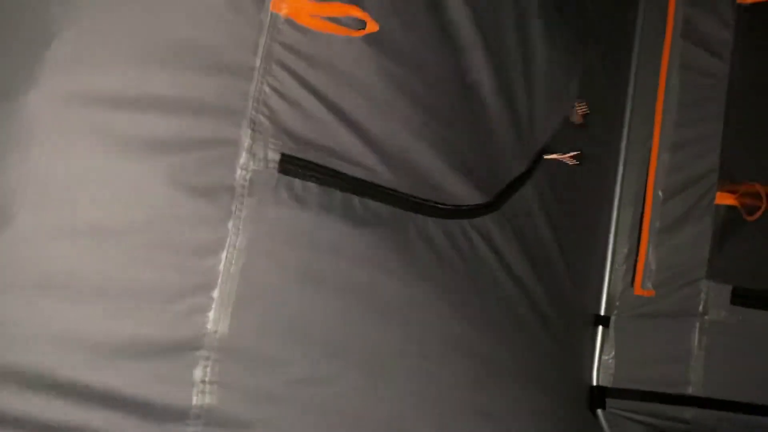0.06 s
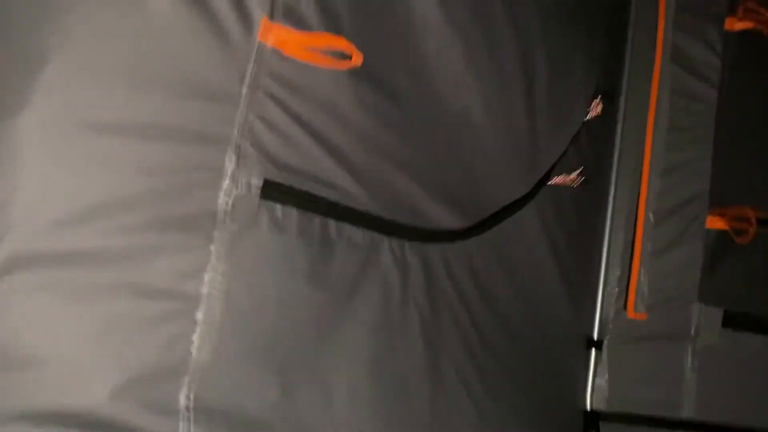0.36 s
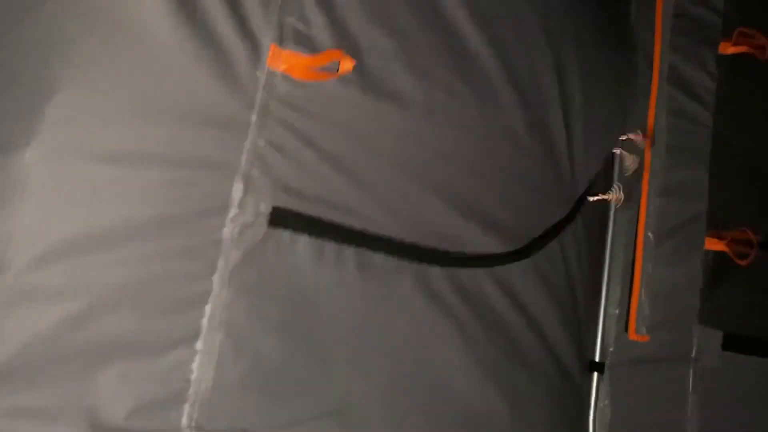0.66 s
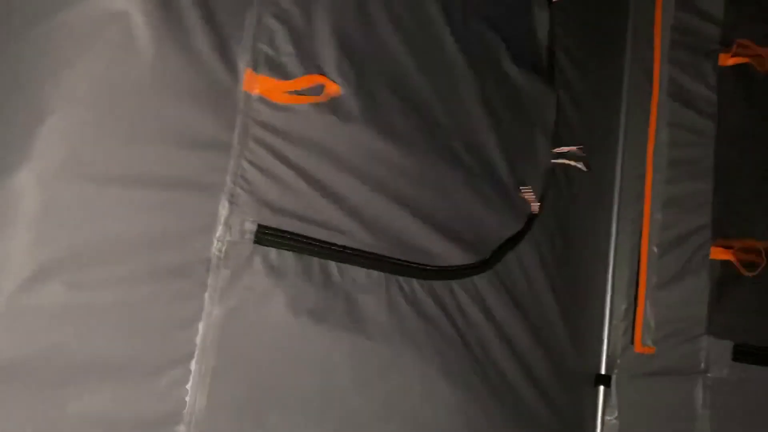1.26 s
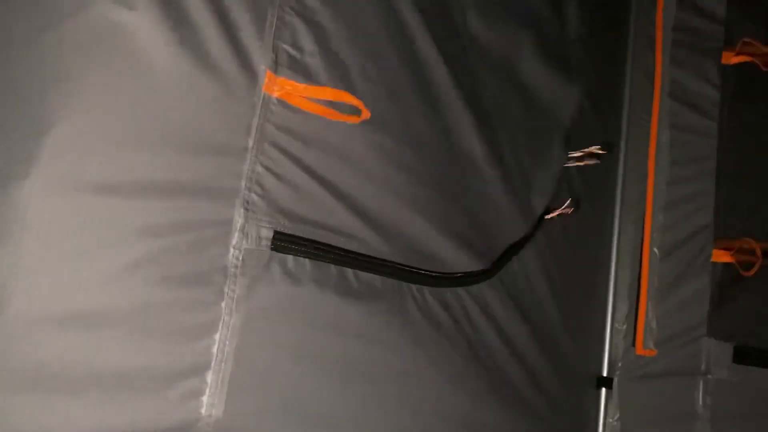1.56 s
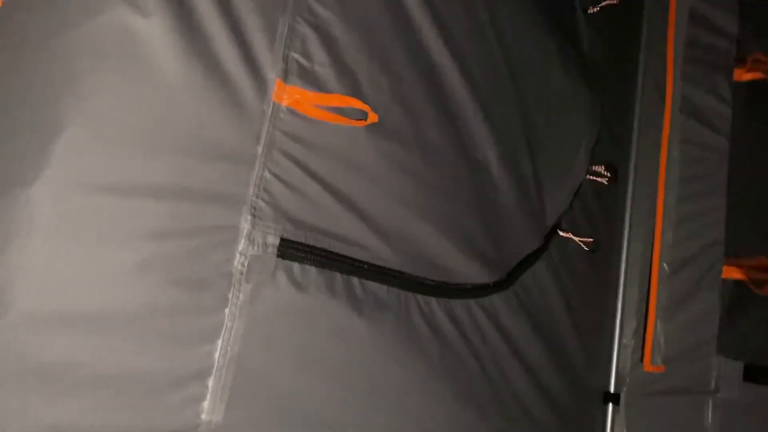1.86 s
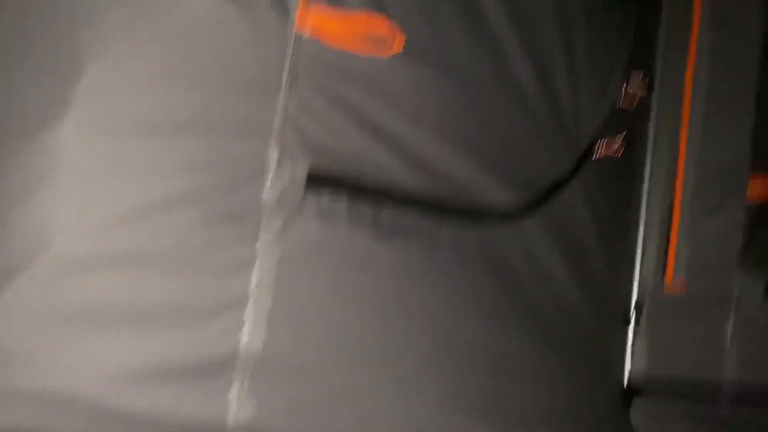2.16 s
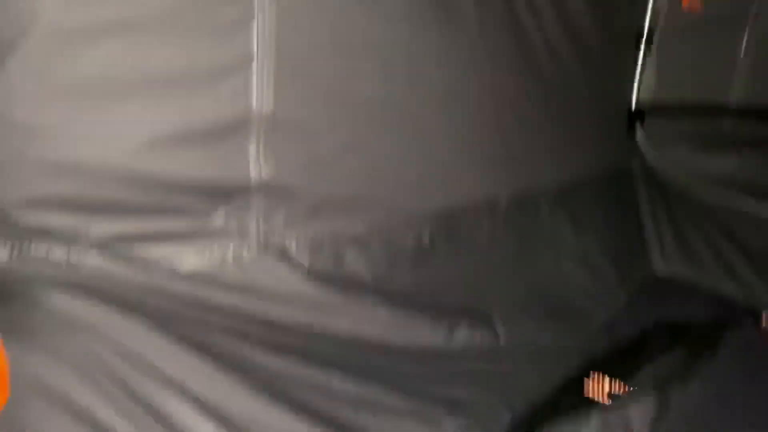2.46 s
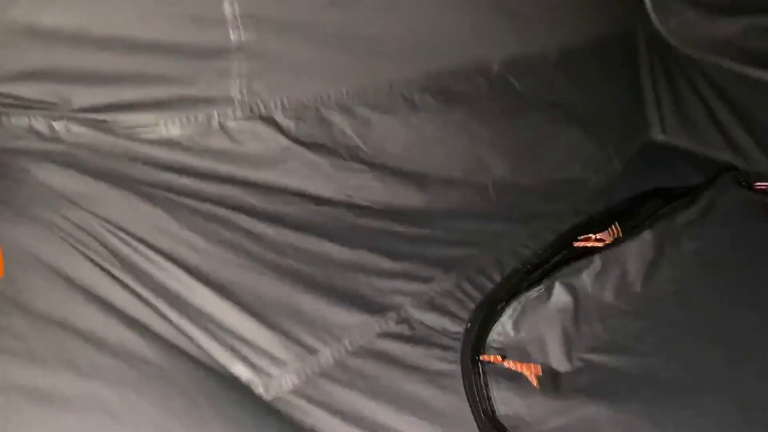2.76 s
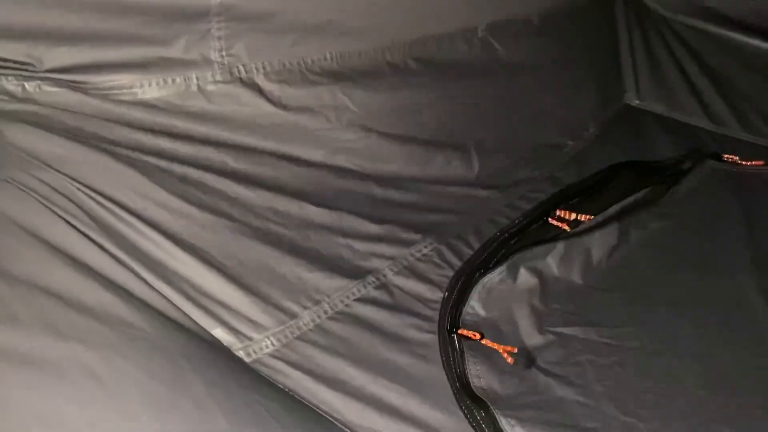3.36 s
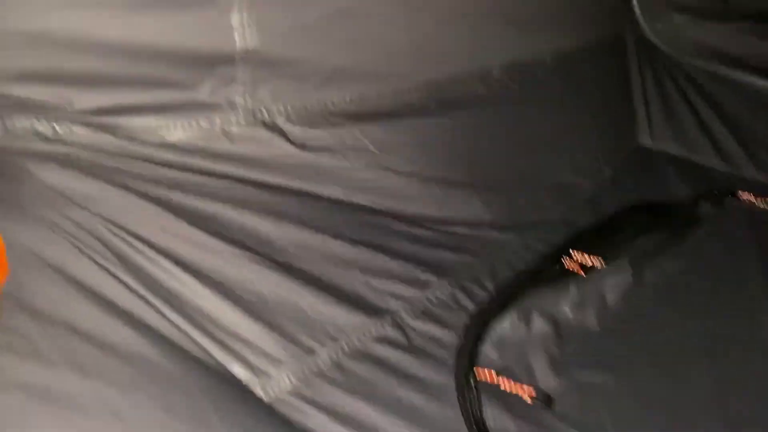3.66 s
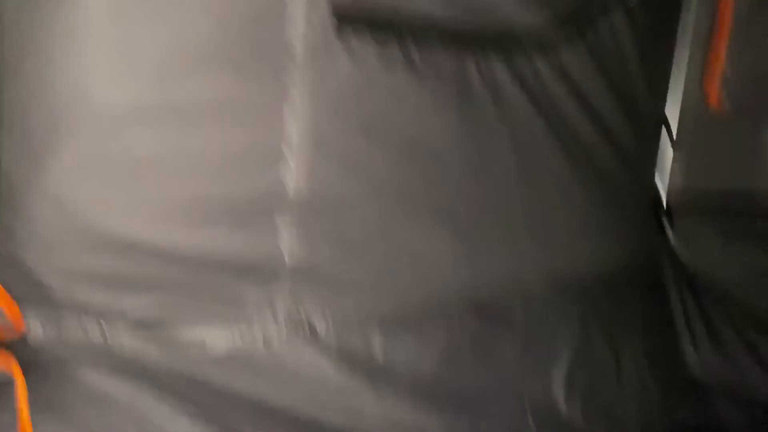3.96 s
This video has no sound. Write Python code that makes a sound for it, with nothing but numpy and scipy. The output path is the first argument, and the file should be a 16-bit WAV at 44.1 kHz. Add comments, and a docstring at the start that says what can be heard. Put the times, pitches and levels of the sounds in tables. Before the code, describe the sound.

Heard inside a tent, loose nylon panels flutter, swish and snap in the wind over a low rumble and dull thumps. Zip pulls on the shaking door keep tinkling, and the wind howls faintly at first.

```python
"""Nylon tent in gusty wind, from inside.

The walls billow with a low rumble and thump as they go taut; the wind howls faintly outside.
Loose panels flutter, flap and swish over each other, and creases snap over.
As the door shakes, the metal zip pulls strike their sliders and jingle in three high modes."""
import sys
import numpy as np
from scipy import signal
from scipy.fft import rfft, irfft, next_fast_len
from scipy.io import wavfile
from scipy.ndimage import map_coordinates

SR = 44100
rng = np.random.default_rng(int(sys.argv[2]) if len(sys.argv) > 2 else 0)


def to_wav(sig):
    """Store sig (one row per channel, or 1-D mono) as 16-bit WAV at the path in sys.argv[1].

    Samples outside -1..1 are clipped; the rate is SR.
    """
    pcm = np.clip(np.atleast_2d(sig), -1, 1) * 32767
    pcm = np.round(pcm).astype(np.int16)
    wavfile.write(sys.argv[1], SR, pcm.T)  # frames by channels


N = 176400

# Spectrum of nylon rubbing on nylon. Each row: frequency in Hz, relative level in dB.
NYLON_SPECTRUM = [(700, 8.5), (1500, 6.5), (2500, 2.5), (4500, 0), (7000, -1), (8700, -9), (11000, -4.5),
                  (15000, -10)]
# Spectrum of a zip pull scraping. Each row: frequency in Hz, relative level in dB.
SCRAPE_SPECTRUM = [(3000, -8), (6000, 1.5), (7500, -3), (8700, 8), (10000, 2), (13000, -3), (15000, -1)]
# Zip pull strikes. Each row: start in seconds, relative levels of the low, middle and top mode in dB.
STRIKES = [(.142, -47, -45, -43), (0.181, -42, -39, -34), (0.234, -34.5, -55, -40),
           (0.257, -51, -38.5, -52), (0.273, -47, -40, -50), (.345, -36.5, -44, -41),
           (0.504, -45, -36, -48), (0.543, -36.5, -42, -37), (0.6, -40, -49, -50), (.66, -45, -41, -39),
           (.676, -31, -50, -35), (.739, -33.5, -40, -32), (.766, -56, -43, -39), (.813, -29.5, -37.5, -36),
           (0.857, -38, -41, -33), (0.905, -62, -30, -53), (.94, -45, -60, -50), (.976, -39.5, -37, -44),
           (1.008, -38, -49, -47), (1.05, -38, -42, -44), (1.076, -35.5, -37.5, -35),
           (1.163, -40, -32.5, -36), (1.214, -49, -48, -34), (1.264, -42, -38, -34),
           (1.313, -35.5, -38.5, -42), (1.36, -47, -54, -41), (1.387, -45, -47, -48),
           (1.461, -54, -34, -41), (1.483, -44, -39, -42), (1.546, -38.5, -44, -38),
           (1.623, -45, -37.5, -56), (1.787, -50, -39.5, -51), (1.81, -52, -43, -56),
           (1.885, -45, -42.5, -56), (1.913, -36.5, -50, -35), (1.934, -45, -51, -46),
           (2.013, -44, -47, -55), (2.054, -54, -58, -39), (2.094, -54, -35.5, -50), (2.136, -40, -37, -49),
           (2.183, -58, -47, -61), (2.246, -43, -58, -55), (2.299, -40.5, -45, -47), (2.345, -54, -42, -59),
           (2.515, -44.5, -44, -49), (2.633, -50, -45, -41), (2.663, -50, -34.5, -37),
           (2.733, -47, -39.5, -44), (2.751, -52, -47, -41), (2.799, -46, -38, -50),
           (2.841, -36.5, -42, -41), (2.891, -44, -38, -43), (2.989, -46.5, -57, -43),
           (3.015, -40.5, -51, -46), (3.06, -43, -42, -48), (3.094, -30, -43, -40), (3.186, -58, -41, -58),
           (3.212, -46, -45, -36), (3.242, -41, -39.5, -50), (3.288, -42, -61, -49), (3.444, -51, -62, -44),
           (3.485, -48.5, -47.5, -58), (3.641, -45.5, -46, -38.5), (3.828, -39, -38.5, -41),
           (3.916, -53, -54, -38), (3.957, -39, -37.5, -35)]


def amp(db):
    """Decibels to gain."""
    return 10 ** (np.asarray(db) / 20)


def unit(x):
    """x at rms 1."""
    return x / np.sqrt(np.mean(x ** 2) + 1e-20)


def along(points, hz):
    """Interpolate (Hz, value) points on a log frequency axis."""
    knots_hz, values = np.transpose(points)
    return np.interp(np.log(hz + 1), np.log(knots_hz + 1), values)


def curve(rows):
    """Interpolate (seconds, value) points at every sample."""
    return np.interp(np.arange(N) / SR, *np.transpose(rows))


def wobble(rate_hz, size=N):
    """Smooth random curve, rate_hz knots a second."""
    knots = rng.standard_normal(int(size * rate_hz / SR) + 4)
    return map_coordinates(knots, [np.arange(size) * rate_hz / SR], mode="wrap")


def filtered(x, response):
    """Apply a frequency response, given as a function of Hz."""
    size = x.shape[-1]
    padded = next_fast_len(size + SR // 10)
    return irfft(rfft(x, padded) * response(np.fft.rfftfreq(padded, 1 / SR)), padded)[..., :size]


def add(track, start_s, sound):
    """Mix a sound into the track, cut to fit."""
    start = round(start_s * SR)
    sound = sound[..., max(-start, 0):]
    part = track[..., max(start, 0):][..., :sound.shape[-1]]
    part += sound[..., :part.shape[-1]]


def spread(pair, colour_db):
    """Two independent noises to partly correlated stereo at rms 1; colour_db is a function of Hz."""
    # Each row: frequency in Hz, left-right correlation.
    correlation = [(125, 0.96), (250, 0.62), (500, 0.49), (1000, 0.41), (2000, 0.24), (4000, 0.52),
                   (5500, 0.085), (6800, 0.83), (14000, 1)]

    def response(hz):
        angle = np.arccos(np.clip(along(correlation, hz), -1, 1)) / 2
        return amp(colour_db(hz)) * [np.cos(angle), np.sin(angle)]

    mid, side = filtered(pair, response)
    return unit(np.array([mid + side, mid - side]))


def rush(spectrum):
    """Steady stereo noise with the given spectrum."""
    return spread(rng.standard_normal((2, N)), lambda hz: along(spectrum, hz))


def clicks(rate_hz, scatter_db, channels):
    """Random impulses of uneven size, simultaneous in all channels."""
    size = amp(scatter_db * np.minimum(rng.standard_normal((channels, N)), 1.5))
    return (rng.random(N) < rate_hz / SR) * size * np.sign(rng.standard_normal((channels, N)))


def crackle(spectrum, rate_hz, scatter_db, t60_s):
    """Tiny decaying noise bursts at random times."""
    t = np.arange(SR // 20) / SR
    impulses = clicks(rate_hz, scatter_db, channels=1)[0]
    power = signal.fftconvolve(impulses ** 2, amp(-60 * t / t60_s) ** 2)[:N]
    return spread(np.sqrt(abs(power)) * rng.standard_normal((2, N)), lambda hz: along(spectrum, hz))


def swell(t, rise_s, t60_s):
    """Soft attack, exponential decay, peak 1."""
    shape = (1 - np.exp(-(t / rise_s) ** 2)) * amp(-60 * t / t60_s)
    return shape / shape.max()


def cusp(t, rise_s, fall_s):
    """Exponential rise to 1 at t = 0, then exponential fall."""
    return np.exp(np.minimum(t / rise_s, -t / fall_s))


def wind_howl(centre_hz=610, width_hz=35, waver=0.032):
    """Faint hollow howl outside: narrow-band noise of wavering pitch."""
    # Each row: time in seconds, level in dB.
    levels = [(0, -41.5), (.4, -42.5), (.9, -41), (1.4, -44.5), (1.9, -57), (2.4, -59.5), (4, -63)]
    phase = 2 * np.pi * np.cumsum(centre_hz * (1 + waver * wobble(5))) / SR
    band = wobble(2 * width_hz) * np.sin(phase) + wobble(2 * width_hz) * np.cos(phase)
    return amp(curve(levels)) * unit(band)


def walls(rumble_db=-2, thump_db=-4, t60_s=0.14, sag=0.043):
    """Billowing walls rumble; one that fills and goes taut thumps, sinking in pitch."""
    # Each row: time in seconds, relative level in dB.
    billow = [(0.0, -15.5), (0.43, -15.5), (0.52, -9), (0.61, -19.5), (0.66, -13), (0.69, -14.5),
              (1.01, -17.5), (1.04, -4), (1.09, -20.5), (1.17, -17.5), (1.2, -14.5), (1.96, -19),
              (1.99, -17.5), (3.75, -19.5), (3.98, -11), (4.0, -24)]
    # Each row: frequency in Hz, relative level in dB.
    rumble_spectrum = [(12, -38), (25, -25), (40, -9.5), (58, 0.5), (72, -1.5), (90, -3), (115, -6),
                       (160, -10.5), (200, -16.5), (260, -22), (400, -30.5), (880, -64.5)]
    # Each row: start in seconds, relative peak in dB, nominal pitch in Hz.
    thumps = [(0.129, -5, 71.6), (0.276, -7, 127), (0.446, -11, 58.4), (0.511, -3, 57), (.632, -0.5, 62.7),
              (0.74, -2.5, 87), (1.025, -13, 74.5), (1.029, -11.5, 171), (1.2, -4.5, 67),
              (1.315, -3.5, 61.6), (1.591, -6, 58.3), (2.038, -5, 62), (2.187, -6, 82.6),
              (2.401, -11, 58.5), (2.446, -4.5, 71), (2.787, -9.5, 88), (3.917, -10, 67.5), (3.945, -3, 91)]
    out = amp(curve(billow) + rumble_db) * rush(rumble_spectrum)
    t = np.arange(SR // 4) / SR
    envelope = swell(t, rise_s=0.01, t60_s=t60_s)
    for start_s, db, hz in thumps:
        phase = 2 * np.pi * hz * t * (1 + sag * (1 - t / t60_s))
        add(out, start_s, amp(db + thump_db) * envelope * np.sin(phase))
    return out


def flutter(rush_db=-1.5, crease_db=-3.0, tremble_db=1.9):
    """Wind ripples the fabric: a trembling rush with dull crease pops."""
    # Each row: time in seconds, relative level in dB.
    wind = [(0.0, -33), (0.43, -33.5), (0.65, -32.5), (1.77, -38.5), (2.21, -36), (2.99, -41), (3.52, -41),
            (3.8, -42.5), (3.87, -35.5), (4.0, -37)]
    # Each row: frequency in Hz, relative level in dB.
    spectrum = [(100, -0.5), (200, 5.5), (330, -6), (510, -3), (600, -2), (900, -5), (1300, -12),
                (2000, -17), (3200, -29), (8000, -72)]
    level = amp(curve(wind) + tremble_db * wobble(30.16))
    ripple = amp(rush_db) * rush(spectrum)
    creases = amp(crease_db) * crackle(spectrum, rate_hz=190, scatter_db=3.5, t60_s=0.01)
    return level * (ripple + creases)


def nylon_slide(crease_db=-5, tremble_db=1.1):
    """Nylon sliding on nylon hisses; its creases crackle."""
    # Each row: time in seconds, relative level in dB.
    sliding = [(0, -39), (.1, -46), (.4, -48.5), (.6, -43.5), (.95, -47), (1.3, -49.5), (1.5, -50),
               (1.7, -53.5), (1.8, -44.5), (2.05, -52), (2.5, -52), (2.85, -52), (3.05, -50.5),
               (3.2, -49.5), (3.36, -54.5), (3.76, -53), (3.87, -53), (4, -44.5)]
    level = amp(curve(sliding) + tremble_db * wobble(50))
    hiss = rush(NYLON_SPECTRUM)
    creases = amp(crease_db) * crackle(NYLON_SPECTRUM, rate_hz=92, scatter_db=10.5, t60_s=0.013)
    return level * (hiss + creases)


def swishes(gain_db=-1, pivot_hz=2000, grain_db=2, grain_hz=700):
    """One panel drags over another: a grainy stroke, brighter or duller."""
    # Each row: centre in seconds, relative level in dB, half length in seconds, treble tilt in dB/octave.
    strokes = [(0.844, -31, .033, -4), (1.225, -30.5, 0.022, 0.5), (1.302, -38.5, 0.019, -0.5),
               (2.379, -46.5, 0.045, 3.5), (2.855, -43, 0.031, 10), (3.886, -40, 0.025, -9)]
    out, t = np.zeros((2, N)), np.arange(-SR // 5, SR // 5) / SR
    for centre_s, db, half_s, tilt in strokes:
        noise = rng.standard_normal((2, len(t)))
        rub = spread(noise, lambda hz: along(NYLON_SPECTRUM, hz) + tilt * np.log2(1 + hz / pivot_hz))
        grain = unit(amp(grain_db * wobble(grain_hz, size=len(t))))
        envelope = amp(db + gain_db) / (1 + (t / half_s) ** 4)
        add(out, centre_s + t[0], envelope * grain * rub)
    return out


def snaps(gain_db=-1):
    """Taut creases snap over with sharp dry ticks."""
    # Each row: start in seconds, relative peak in dB.
    ticks = [(0.0458, -28.5), (0.303, -31.5), (0.3333, -29), (0.395, -31), (0.571, -26), (0.619, -37),
             (1.0305, -34), (1.211, -36), (1.447, -30.5), (1.5781, -32), (2.0537, -30.5), (2.1365, -34.5),
             (2.17, -31.5), (2.2007, -38), (2.4023, -35.5), (2.6185, -29), (3.1616, -35), (3.371, -38),
             (3.5964, -34)]
    # Each row: frequency in Hz, relative level in dB.
    spectrum = [(400, -20), (1000, 11), (4000, -4), (7000, -6), (15000, -16.5)]
    level, t = np.zeros(N), np.arange(SR // 20) / SR
    for start_s, db in ticks:
        add(level, start_s, amp(db + gain_db) * swell(t, rise_s=0.0008, t60_s=0.015))
    return level * rush(spectrum)


def flaps(crack_hz=2100, rustle_db=-23, rustle_s=0.03, crinkle_db=2.8, crinkle_hz=550):
    """A loose panel flaps: a puff in three noise bands (body, slap, crack), set in a weaker rustle."""
    # Each row: peak time in seconds, relative body, slap and crack levels in dB, body and slap in Hz.
    events = [(.014, -24.5, -22, -23.5, 267, 815), (0.092, -28, -30, -46, 380, 736),
              (0.206, -21.5, -26.5, -45, 360, 960), (.49, -28, -27, -34.5, 338, 984),
              (.522, -24.5, -27.5, -34, 340, 790), (0.629, -28, -25, -41, 358, 886),
              (.647, -53, -36, -46, 353, 1190), (0.737, -27, -31, -46, 302, 965),
              (1.032, -19, -23, -28, 344, 993), (1.535, -34.5, -34, -40, 390, 870),
              (1.678, -19.5, -37, -59, 213, 930), (1.957, -36, -36.5, -43, 262, 760),
              (2.04, -31.5, -32, -55, 245, 993), (2.171, -38, -28, -38, 350, 900),
              (2.463, -55, -38.5, -45, 300, 1410), (2.6131, -34, -24.5, -22.5, 266, 807),
              (2.71, -30, -36, -34, 345, 1086), (2.78, -34, -32, -60, 294, 904),
              (2.802, -25.5, -34, -54, 276, 910), (2.822, -20.5, -35, -36, 267, 860),
              (3.130, -37, -27, -61, 300, 720), (3.406, -37.5, -35.5, -48, 303, 900),
              (3.605, -30, -28.5, -48, 364, 778), (3.844, -30, -33, -51, 310, 816),
              (3.861, -38, -31.5, -45, 330, 714), (3.943, -36, -24.5, -57, 240, 980)]
    # Body, slap, crack. Each row: half width in octaves, rise and fall in seconds, gain in dB.
    bands = [(.35, 0.007, 0.007, 0.5), (0.42, 0.003, 0.005, 1.5), (.33, 0.0007, 0.0042, -4)]
    out, t = np.zeros((2, N)), np.arange(-SR // 10, SR // 10) / SR
    rustle = amp(rustle_db) * np.exp(-abs(t) / rustle_s)
    for peak_s, *levels_db, body_hz, slap_hz in events:
        centres_hz = (body_hz, slap_hz, crack_hz)
        for db, centre_hz, (octaves, rise_s, fall_s, gain_db) in zip(levels_db, centres_hz, bands):
            envelope = cusp(t, rise_s, fall_s) + rustle
            crinkle = amp(crinkle_db * wobble(crinkle_hz * centre_hz / crack_hz, size=len(t)))
            noise = rng.standard_normal((2, len(t)))
            band = spread(noise, lambda hz:
                          -10 * np.log10(1 + (np.log2((hz + 1) / centre_hz) / octaves) ** 4))
            puff = unit(envelope * crinkle * band) * np.sqrt(np.mean(envelope ** 2))
            add(out, peak_s + t[0], amp(db + gain_db) * puff)
    return out


def pull_modes(pitch_ratio):
    """Ringing of a zip pull after one contact, one row per mode."""
    # Low, middle and top mode: nominal frequency in Hz.
    modes_hz = [6228, 11190, 14980]
    # The same modes: time to fall 60 dB in seconds.
    t60_s = [0.015, 0.019, 0.0084]
    t = np.arange(SR // 20) / SR
    decay = amp(-60 * t / np.array(t60_s)[:, None])
    return decay * np.sin(2 * np.pi * pitch_ratio * np.outer(modes_hz, t))


def zip_rattle(ring_db=-12, scrape_db=-13, clump_db=3):
    """Around each strike, clumps of light contacts scrape the pulls and ring every mode."""
    power, t = np.zeros((3, N)), np.arange(-SR // 5, SR // 5) / SR
    envelope = cusp(t, rise_s=0.006, fall_s=0.03)
    for strike_s, *modes_db in STRIKES:
        add(power, strike_s + t[0], np.outer(amp(modes_db), envelope) ** 2)
    shake = np.sqrt(power) * unit(amp(clump_db * np.minimum(wobble(90), 1.5)))
    contacts = shake * unit(clicks(rate_hz=450, scatter_db=4, channels=3))
    ringing = sum(signal.fftconvolve(hits, mode / np.linalg.norm(mode))[:N]
                  for hits, mode in zip(contacts, pull_modes(1)))
    grit = crackle(SCRAPE_SPECTRUM, rate_hz=300, scatter_db=4, t60_s=0.0046)
    scraping = np.linalg.norm(shake, axis=0) * grit
    return amp(ring_db) * ringing + amp(scrape_db) * scraping


def zip_strikes(gain_db=2.5, detune=0.003, bounce_s=0.0024, loss_db=3.5, tick_db=-1.5, tick_t60_s=0.013):
    """A pull hits its slider and chatters to rest; the pitch varies slightly from strike to strike."""
    ringing, ticks, t = np.zeros(N), np.zeros(N), np.arange(SR // 20) / SR
    for contact_s, *modes_db in STRIKES:
        modes = pull_modes(1 + detune * rng.standard_normal())
        for bounce in range(10):
            gains = amp(np.array(modes_db) + gain_db - loss_db * bounce + rng.normal(0, 1.1))
            gains *= min((bounce + 1) / 1.3, 1)  # softens the first contact
            add(ringing, contact_s, gains @ modes)
            add(ticks, contact_s, gains[-1] * amp(tick_db - loss_db * bounce - 60 * t / tick_t60_s))
            contact_s += bounce_s * rng.uniform(0.45, 1.9)
    return ringing + ticks * rush(SCRAPE_SPECTRUM)


def scene():
    """Wind, fabric and zip pulls, in stereo."""
    background = walls() + flutter() + wind_howl()
    panels = flaps() + snaps() + nylon_slide() + swishes()
    return background + panels + zip_strikes() + zip_rattle()


def record(dry, ceiling=0.85, lag_s=0.000235, lag_from_hz=6900, top_hz=15850):
    """Microphone pair: slight imbalance, left lag in the high treble, band limit; the loudest peaks are softly
    rounded."""
    # Each row: frequency in Hz, left minus right in dB.
    balance = [(60, -1), (380, 0), (900, -2.5), (2000, 0), (3500, 2.5), (5500, 3), (7000, 0.7),
               (15000, -0.5)]
    sides = np.array([[0.5], [-0.5]])

    def response(hz):
        lag = np.exp(-2j * np.pi * lag_s * np.maximum(hz - lag_from_hz, 0) * sides)
        return amp(along(balance, hz) * sides) * lag * (hz < top_hz)

    rounded = dry / (1 + (dry / ceiling) ** 6) ** (1 / 6)
    return filtered(rounded, response)


dry = scene()
out = record(dry)
to_wav(out)
```